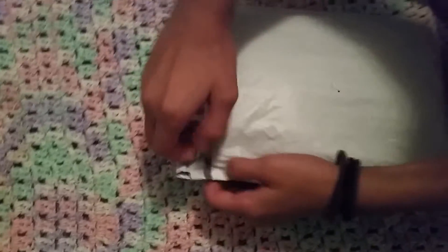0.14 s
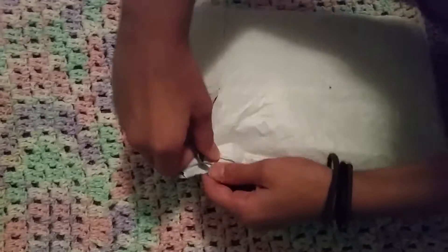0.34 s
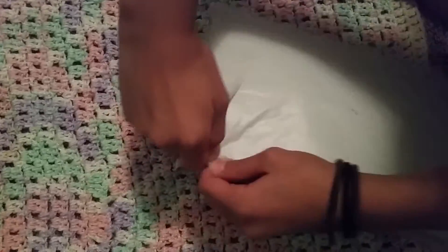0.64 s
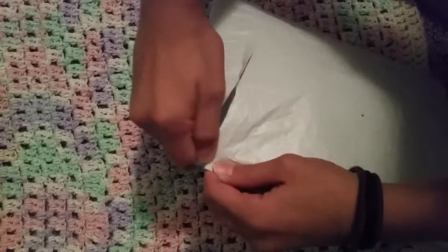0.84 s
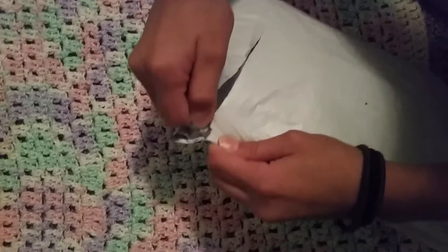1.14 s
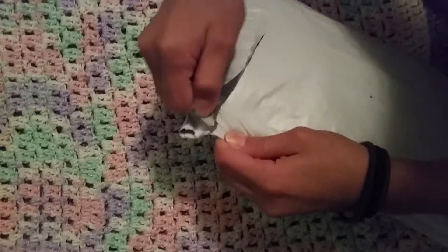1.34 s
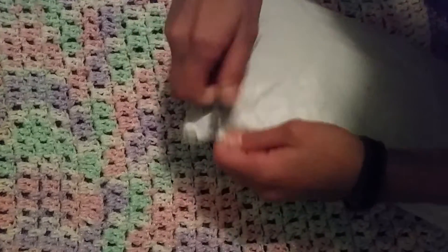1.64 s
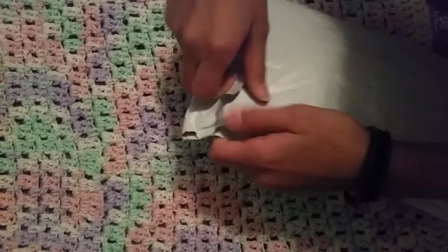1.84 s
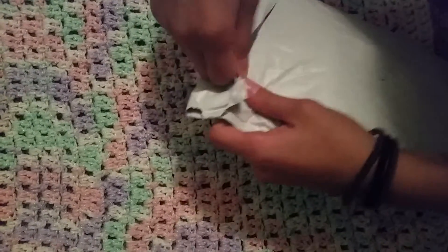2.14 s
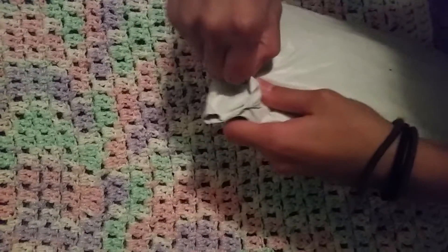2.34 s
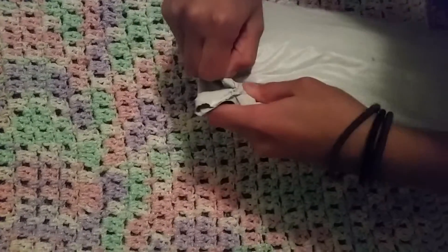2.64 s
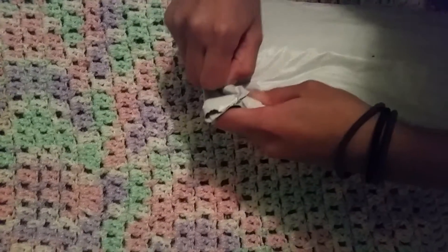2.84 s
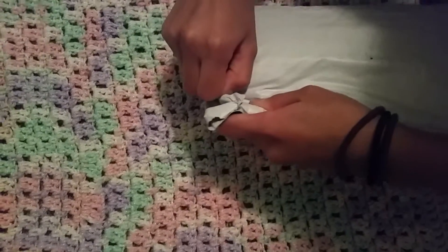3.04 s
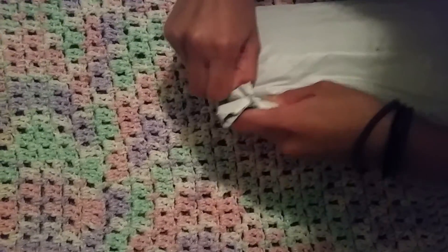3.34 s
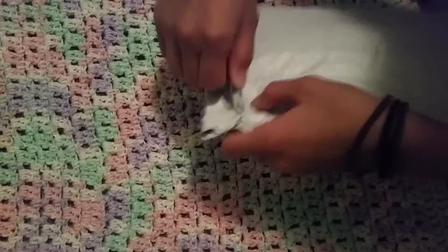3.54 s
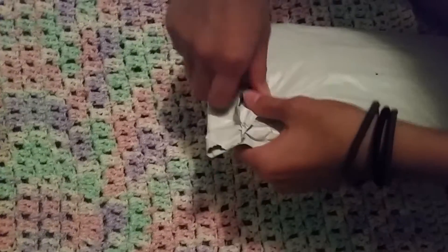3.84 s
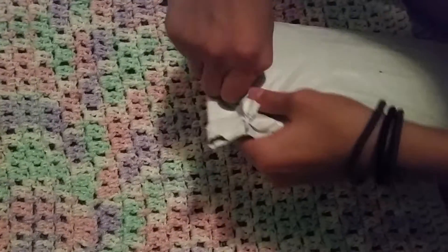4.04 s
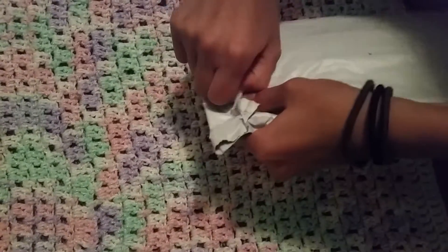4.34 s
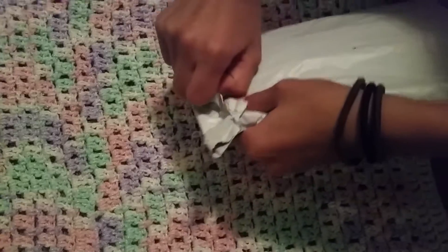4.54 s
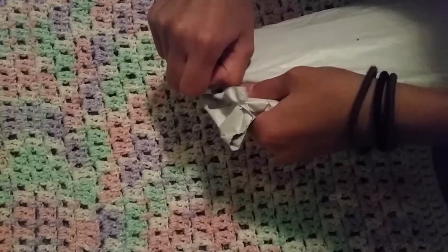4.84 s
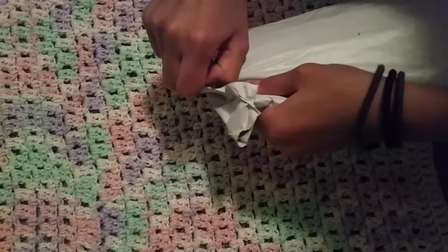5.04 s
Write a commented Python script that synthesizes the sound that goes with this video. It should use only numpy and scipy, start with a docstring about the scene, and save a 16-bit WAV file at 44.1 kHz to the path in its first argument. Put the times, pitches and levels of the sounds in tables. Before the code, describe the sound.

A plastic padded mailer is picked, pulled and crumpled on a soft blanket. Light clicks open, a cluster of sharper crackles follows before one second, then a sparser stretch. Denser crinkling with a tiny stick-slip creak arrives past two seconds, and the loudest clump of snaps and wall pops near four. The sound is close, stereo, leaning left, with thin short echoes and a low, faintly wavering room hum.

```python
"""Crisp snaps and grainy rustle come first: fingers pick and pull at a padded plastic envelope on a blanket,
close to a pair of small microphones. Creases snap over and padded walls buckle: clicks through five bands.
Tugs swell a rustle of random grains over a noise bed; the padded wall creaks in quickening slips.
Thin echoes from nearby surfaces follow, and a low hum of shaped noise fills the room."""
import sys
import numpy as np
from scipy import signal
from scipy.fft import rfft, irfft
from scipy.io import wavfile

SR = 44100
rng = np.random.default_rng(int(sys.argv[2]) if len(sys.argv) > 2 else 0)


def inscribe(sig):
    """Save sig as 16-bit PCM at rate SR to the path in sys.argv[1].

    A 1-D sig is mono; a 2-D sig holds one channel per row.
    Samples are clipped to [-1, 1] before scaling.
    """
    pcm = np.round(np.clip(np.atleast_2d(sig).T, -1, 1) * 32767)
    wavfile.write(sys.argv[1], SR, pcm.astype(np.int16))


def ratio(d):
    """dB to gain"""
    e = np.asarray(d, float) / 20
    return 10 ** e


N = 229577  # length in samples

# Creases of the film snapping over; a negative fall makes a hollow snap:
# start_s, level_db at its own pitch, pitch_octaves above 1 kHz, fall_db_per_octave away from that pitch
CREASE_SNAPS = [(0.0048, -35, 3.6, 14), (0.017, -31, 2.8, 4.5), (0.0279, -42, 4.8, 14),
                (0.1557, -33, 3.0, 4), (0.1722, -28, 2.45, 2), (0.1826, -32, 2.45, 6),
                (0.2328, -27.5, 3.9, 3), (0.2386, -34, 2.45, 0), (0.2518, -38, 4.1, 4),
                (0.4043, -35.5, 2.2, 4), (0.432, -38, 3.75, 8), (0.4748, -47, 2.45, -5),
                (0.5378, -26, 4.2, 16), (0.5576, -27.5, 2.45, 5), (0.634, -28, 4, 2),
                (0.6824, -18, 3.4, 14), (0.6936, -28, 3, -9), (0.7047, -21.5, 4, 1.5), (0.728, 0, 4.05, 33),
                (0.7679, -24, 3.3, 14), (0.8511, -37.5, 3.2, 0), (0.8982, -43, 2.45, 8),
                (0.9155, -34.5, 2.45, 6), (0.96, -32, 4, 1), (0.9907, -26, 4.1, 12), (0.996, -29, 2.2, 8),
                (1.0067, -32, 3.5, 14), (1.022, -36, 3.75, 6), (1.0324, -32, 2.45, 4),
                (1.0424, -28.5, 2.9, 12), (1.0646, -26.5, 3.2, 10), (1.1147, -37.5, 3.75, -3),
                (1.1274, -32, 3.1, 22), (1.185, -35, 3.1, 10), (1.197, -35, 2.8, 2), (1.2375, -27, 2.9, 21),
                (1.2731, -24.5, 3.55, 29), (1.3409, -38, 3.7, 10), (1.369, -54, 2.45, 5),
                (1.5945, -39, 2.45, -4), (1.6457, -37, 4.2, 10), (1.6931, -34, 4, 15),
                (1.7399, -4, 4.29, 23), (1.749, -31, 3.75, 2), (1.7541, -36, 4.2, 6),
                (1.8418, -34.5, 3.7, 3.5), (1.904, -28.5, 3.0, 24), (1.9272, -25, 4.1, 2.5),
                (2.0817, -24, 3.3, 13), (2.1066, -23, 3.65, 19), (2.1157, -30, 3.5, 9),
                (2.1276, -37, 4.6, 7), (2.1646, -23, 2.45, 7), (2.1786, -13, 4.2, 15),
                (2.1835, -25, 4.5, 8), (2.2145, -16, 3.8, 3), (2.2205, -11, 2.45, 21),
                (2.2265, -34, 4.1, 4), (2.2999, -20, 2.5, 19), (2.3533, -37, 2.45, 12), (2.4084, -34, 3, 9),
                (2.4608, -25.5, 3.75, 4.5), (2.4975, -21, 3.1, 11), (2.586, -22, 4.1, 10),
                (2.6983, -33, 4.9, 17), (2.7101, -28, 3.2, 24), (2.8163, -35, 2.45, -1),
                (2.8621, -23, 3.26, 16), (2.8913, -27.5, 3.15, 8), (3.0006, -37, 2.5, 10),
                (3.0211, -23.5, 2.7, 10), (3.069, -33, 3.75, 6), (3.0815, -29, 3.4, 12),
                (3.0939, -29, 3.2, 11), (3.1366, -15.5, 3.64, 17), (3.1536, -21, 2.73, 11),
                (3.158, -36, 3, 6), (3.1799, -26, 3.7, 9), (3.2166, -34, 2.45, 2), (3.2323, -35, 2.45, 6),
                (3.3326, -40, 3.75, 2), (3.3576, -27, 2.55, 27), (3.3738, -26, 2.2, 4),
                (3.5842, -28, 4.5, 6), (3.6004, -21, 4.1, 5), (3.6516, -9.5, 4.1, 19),
                (3.677, -27, 4.9, 17), (3.8774, -29, 2.45, 2), (3.8835, -26.5, 3.1, 14),
                (3.89, -29.5, 2.6, 4), (3.8952, -21, 3.3, 5), (3.9779, -38, 3.5, 14), (4.0261, -16, 2.8, 7),
                (4.036, -13.5, 2.34, 9), (4.0445, -20, 2.5, 12), (4.0503, -25, 3.1, 8),
                (4.0734, -11, 3.56, 15), (4.0799, -21, 2.6, 10), (4.0866, -18, 3.75, 8),
                (4.1064, -26, 2.45, 1), (4.1515, -28, 4.2, 9), (4.1926, -30, 4.1, 5), (4.2319, -34, 4.4, 8),
                (4.3223, -37, 3.75, 0), (4.3471, -25, 4.1, 14), (4.399, -26.5, 3.75, 0),
                (4.5748, -33, 3.1, 4), (4.5854, -37, 2.45, 12), (4.606, -16, 2.74, 12.5),
                (4.6511, -32, 3.6, 2), (4.672, -32, 2.45, 13), (4.6926, -26.5, 4.1, 6),
                (4.7351, -32, 3.45, 11), (4.7547, -30, 2.45, 10), (4.854, -31.5, 2.45, 22),
                (4.9372, -30.5, 2.8, 4), (4.9429, -36, 3.2, 10), (4.9635, -16, 2.7, 7),
                (5.013, -23, 3.06, 11), (5.0288, -43, 2.45, 8), (5.0662, -39, 2.45, 10),
                (5.1268, -21, 3.2, 16), (5.1444, -35, 3.1, 2), (5.1532, -27, 3.0, 11),
                (5.1725, -33, 3.9, 14)]
# Padded walls buckling: start_s, level_db at its own pitch, pitch_octaves above 1 kHz
WALL_POPS = [(0.0562, -27.0, -0.15), (0.0735, -25, 0.32), (0.1021, -28.0, 0.27), (0.1738, -32, 0.45),
             (0.1829, -17.5, 0.26), (0.2242, -33, -0.65), (0.2324, -21, -0.28), (0.2425, -28, -0.49),
             (0.2995, -31, 0.12), (0.3364, -39, 0.037), (0.3559, -32.0, 0.29), (0.403, -36, 0.68),
             (0.4317, -27, 0.1), (0.4398, -27.5, -0.3), (0.6318, -25, 0.09), (0.6477, -31, 0.64),
             (0.6838, -31.0, 0.37), (0.6935, -22, 0.36), (0.7038, -21, 0.39), (0.751, -30, 0.016),
             (0.7703, -33.0, -0.11), (0.785, -33.5, -0.21), (0.8982, -23, 0.34), (0.9167, -29.5, 0.45),
             (0.9758, -33.5, 0.93), (0.996, -25, 0.82), (1.0219, -22, 0.1), (1.0645, -30, 0.21),
             (1.0917, -43, -0.15), (1.106, -37.0, 0.48), (1.1476, -33, -0.11), (1.1972, -24, 0.27),
             (1.3699, -37.0, 0.51), (1.4428, -32, -0.11), (1.4557, -44, 0.76), (1.5004, -42, 0.62),
             (1.553, -46, 0.53), (1.5946, -36, 0.53), (1.636, -29, 0.29), (1.7013, -28, 0.32),
             (1.7378, -21, 0.24), (1.7531, -29, -0.61), (1.768, -30, 0.03), (1.8198, -32.5, -0.12),
             (1.8286, -35, -0.27), (1.9006, -27, -0.047), (1.9189, -28.5, -0.3), (1.9242, -26, 0.15),
             (1.9717, -26.5, 0.2), (2.0368, -33.5, -0.22), (2.044, -42, 0.72), (2.0684, -39, 0.92),
             (2.0821, -26.5, -0.32), (2.1138, -17, -0.39), (2.2187, -16, 0.18), (2.244, -20, 0.26),
             (2.2765, -27, 0.045), (2.293, -20, 0.19), (2.303, -32, -0.11), (2.3125, -25.0, 0.14),
             (2.3244, -24.5, 0.2), (2.353, -24.5, 0.47), (2.3825, -28, 0.094), (2.4107, -27.5, 0.5),
             (2.4265, -18.5, 0.11), (2.4596, -35, 0.5), (2.4963, -31.5, 0.93), (2.5617, -22.5, 0.34),
             (2.586, -21.5, -0.18), (2.611, -41, -0.3), (2.644, -34, -0.24), (2.6597, -35, 0.26),
             (2.6885, -33, 0.27), (2.7131, -36, -0.48), (2.7842, -29.5, 0.27), (2.8622, -42, 0.92),
             (2.891, -32, 0.36), (2.9523, -21, 0.05), (2.963, -41, 0.56), (3, -25, 0.13),
             (3.0206, -20.5, 0.71), (3.0369, -21.5, 0.22), (3.0595, -21, 0.29), (3.0924, -37, 0.17),
             (3.153, -21.5, 0.24), (3.1664, -37, -0.38), (3.1792, -45, 0.59), (3.22, -31, 0.38),
             (3.231, -28, 0.18), (3.3575, -36, 0.0045), (3.372, -41, 0.93), (3.4813, -23, -0.04),
             (3.4917, -24.5, 0.2), (3.602, -29.5, 0.05), (3.6515, -14, -0.16), (3.6596, -21.0, -0.58),
             (3.7814, -31.5, 0.49), (3.8507, -32, 0.074), (3.877, -32, 0.19), (3.8944, -25, 0.04),
             (3.9152, -27, 0.5), (4.0256, -12.5, -0.25), (4.0359, -10.5, -0.19), (4.0449, -15.5, -0.3),
             (4.0526, -32, -0.37), (4.084, -21.5, -0.03), (4.097, -21, 0.22), (4.1067, -27, 0.14),
             (4.1519, -41, 0.9), (4.1614, -33.5, 0.66), (4.274, -30.5, 0.24), (4.33, -25, 0.19),
             (4.3979, -32.5, 0.48), (4.4209, -29, 0.21), (4.4459, -26.5, 0.19), (4.4696, -39, -0.087),
             (4.5434, -50, -0.3), (4.6062, -40, 0.41), (4.6705, -25, 0.14), (4.6922, -37.0, 0.27),
             (4.7545, -40, 0.44), (4.7794, -46, -0.25), (4.8778, -27, 0.18), (4.9357, -34.5, 0.036),
             (4.9639, -21, 0.27), (4.9958, -33.0, -0.12), (5.0129, -31.0, -0.27), (5.029, -31, 0.36),
             (5.0854, -30, 0.23), (5.1231, -37, 0.55), (5.1443, -32.5, 0.36), (5.152, -34, 0.31),
             (5.187, -28.5, 0.42)]
POP_FALL_DB_PER_OCTAVE = 14.5
# Pitch at which each part of the envelope speaks: pitch_octaves above 1 kHz
PART_PITCHES = np.log2([.5, 1.9, 5.5, 8.7, 13.5])
# Parts of the envelope, padding first: low_hz, high_hz, rustle_db relative to the handling,
# scatter_ms, scatter_db relative to the click envelope, likeness of left and right (0 to 1)
SHEET_PARTS = [(176, 1940, -3.5, 1.2, -4.5, 0.47), (1038, 3280, -0.5, 0.8, 0.5, 0.29),
               (3700, 7210, -3.5, 0.58, -0.5, 0.31), (7540, 10170, -4, 0.78, -8.5, 0.18),
               (11050, 21300, -2.5, 0.51, 1, 0.13)]
# Ringing modes of the padded walls: pitch_hz, level_db relative, t60_s
PADDING_MODES = [(412, -3, 0.02), (532, -0.5, 0.014), (663, -12, 0.017), (820, -4, 0.01),
                 (1264, -5.5, 0.0079)]
# Tugs of the fingers: middle_s, length_s, film_db, padding_db relative to the film
FINGER_TUGS = [(0.0, 0.27, -54, -9), (0.094, 0.18, -51, -1.5), (0.208, 0.21, -44, -3.5),
               (0.298, 0.22, -53.5, -4.5), (0.449, 0.21, -54, 0.5), (0.667, 0.58, -46, -6.5),
               (0.75, 0.14, -48.5, -3.5), (0.917, 0.15, -48.5, -5), (1.036, 0.17, -49.5, -5),
               (1.208, 0.45, -58, -5), (1.43, 0.16, -54.5, -7), (1.56, 0.35, -49, -5.5),
               (1.754, 0.21, -50, -3.5), (1.95, 0.28, -49, -7), (2.172, 0.42, -42.5, -7),
               (2.306, 0.38, -39, -5.5), (2.494, 0.37, -45.5, -6.5), (2.685, 0.33, -40, -8),
               (2.887, 0.37, -53, -6.5), (3.021, 0.29, -43, -7.5), (3.233, 0.23, -55, -2.5),
               (3.382, 0.27, -54, -5.5), (3.522, 0.19, -52, -4), (3.657, 0.23, -42, -4.5),
               (3.74, 0.7, -55.5, -1.5), (3.942, 0.9, -48.5, -11.5), (4.095, .07, -40, -8),
               (4.155, 0.19, -54, -6), (4.373, 0.54, -49, -7), (4.566, 0.23, -55, -5),
               (4.713, 0.28, -49.5, -8), (4.872, 0.21, -55.5, -8), (5.06, 0.38, -51, -9.5),
               (5.196, 0.17, -41, -11)]
# Overall left and right colour of the envelope's sound, with a steep treble cutoff above 14.5 kHz:
# pitch_hz, left_db, right_db
STEREO_COLOUR = [(100, 0.1, 0.1), (400, 1, -2), (750, 1, -6), (1000, -6, -13), (1400, -1, -7),
                 (2100, -1, -12), (2900, -8, -16), (3600, -8, -20), (4000, -12, -19), (4600, -7, -13),
                 (5600, 1, -11), (6500, -1, -11), (7200, -5, -14), (8000, -1, -17), (10000, -5, -12),
                 (12400, -9, -3), (13000, -10, -3), (14300, -8, 4), (14520, -8, 3), (14900, -26, -16),
                 (16000, -46, -40)]
# Loudness curve of the hum: time_s, level_db
HUM_LEVEL = [(0.0, -41), (0.55, -42), (0.9, -46), (1.0, -43.5), (2.1, -46), (3.2, -44), (4.0, -44),
             (4.7, -50.5), (5.21, -45.5)]
# Colour of the hum, relative and without its drone: pitch_hz, level_db per Hz
HUM_COLOUR = [(15, -30), (30, -11.5), (58, 0.5), (72, -6), (100, -0.5), (125, -8), (155, -10), (215, -7),
              (290, -19.5), (450, -20), (1000, -32), (1500, -38.5)]
# Stereo image of the hum: pitch_hz, likeness of left and right (0 to 1)
HUM_LIKENESS = [(25, .65), (60, .8), (130, .6), (500, .55), (1000, .4)]

# rustle: middling grain rate, grain level spread, noise bed relative to the grains
GRAINS_PER_S, GRAIN_SPREAD_DB, BED_DB = 800, 4.3, -8
RESTING_FILM_DB, RESTING_PADDING_DB = -67.5, -71.5
# stereo delay of the left channel (negative: left first), and its random spread
LEFT_LAG_MS, SPREAD_MS = -.05, .07
# scatter after a click: growth of its level with the click (dB per dB), click level that counts as usual
SCATTER_GROWTH, USUAL_SNAP_DB = 0.74, -38.5
# creak: slip timing, then its nearly steady level and quick end
CREAK_S, FIRST_GAP_S, GAP_SHRINK, SLIP_COUNT = 2.1228, .0127, .846, 13
CREAK_DB, CREAK_TOP_S, CREAK_RISE_DB_PER_S, CREAK_FALL_DB_PER_S, SLIP_SPREAD_DB = -22, 2.188, 10, 900, 2.5
SLIP_CUT_HZ, SLIP_PANEL_DB = 580, -14  # low cut of the slips; share of a slip that reaches the panel
ECHO_DB, ECHO_T60_S = -13, .15
DRONE_HZ, DRONE_WIDTH_HZ, DRONE_DB = 103.3, 18.3, 11  # the boost above the hum colour


def envelope(colour):
    """Snaps, slips and grains excite each part of the sheet; a swelling, dying scatter follows every click."""
    slips = creak()
    lag_ms = LEFT_LAG_MS + SPREAD_MS * rng.standard_normal(N)
    padding_db, film_db = handling()
    born, grain_sizes, grain_draws = grains()
    grain_lag_ms = LEFT_LAG_MS + SPREAD_MS * grain_draws[:, 5]
    out = 0
    for k, (low_hz, high_hz, rustle_db, scatter_ms, scatter_db, alike) in enumerate(SHEET_PARTS):
        band = signal.butter(3, [low_hz, high_hz], "band", fs=SR, output="sos")
        part = signal.sosfilt(band, colour)
        at, sizes = snaps(k)
        hits = clicks(at, sizes, lag_ms[at])
        if k == 0:  # the lowest part is the padding: it rings
            part = through(part, [padding()])
        if k < 2:  # the slips push padding and panel
            hits += slip_push(slips, k * SLIP_PANEL_DB)
        part = part / np.abs(part).max(axis=1).mean()

        grain_clicks = clicks(born, grain_sizes * ratio(2.7 * grain_draws[:, k]), grain_lag_ms)
        mid, side = rng.standard_normal((2, N))
        noise = np.sqrt((1 + alike) / 2) * mid + np.sqrt((1 - alike) / 2) * side * [[1], [-1]]
        ragged_grains = scattered(grain_clicks, noise, scatter_ms, scatter_db)
        ragged_hits = scattered(hits, noise, scatter_ms, scatter_db, usual=ratio(USUAL_SNAP_DB))
        # reversed in time, the noise serves as a separate bed
        bed = rms_one(through(noise[:, ::-1], part))
        rustle = rms_one(through(ragged_grains, part)) + ratio(BED_DB) * bed
        handling_db = film_db if k > 1 else padding_db
        out = out + through(ragged_hits, part) + ratio(handling_db + rustle_db) * rustle
    return out


def snaps(part):
    """Folds click into one part of the sheet: the nearer its pitch to that of the fold, the louder."""
    rows = np.array(WALL_POPS if part < 2 else CREASE_SNAPS)
    start_s, level_db, pitch_octaves = rows[:, :3].T
    fall_db = POP_FALL_DB_PER_OCTAVE if part < 2 else rows[:, 3]
    level_db = level_db - fall_db * np.abs(pitch_octaves - PART_PITCHES[part])
    return np.round(start_s * SR).astype(int), ratio(level_db)


def clicks(at, sizes, lag_ms):
    """One click per event; its place on the sheet, given as a lag, sets the delay between left and right."""
    out = np.zeros((2, N + 64))
    left_at = np.clip(at + np.round(lag_ms * SR / 1000).astype(int), 0, N)
    np.add.at(out[0], left_at, sizes)
    np.add.at(out[1], at, sizes)
    return out[:, :N]


def scattered(x, noise, scatter_ms, scatter_db, usual=1):
    """Noise swells and dies after each click, growing less than the click: big snaps clean, small ragged."""
    r = np.exp(-1000 / (scatter_ms * SR))
    drive = np.abs(x / usual) ** (2 * SCATTER_GROWTH) + 1e-18
    power = signal.lfilter([(1 - r) ** 2], [1, -2 * r, r * r], drive)
    return x + ratio(scatter_db) * noise * usual * np.sqrt(power)


def padding():
    """The padded walls ring in decaying modes after a push; so small a body radiates little bass."""
    t = np.arange(2048) / SR
    ring = sum(ratio(db - 60 * t / t60) * np.sin(2 * np.pi * hz * t) for hz, db, t60 in PADDING_MODES)
    return signal.lfilter(*signal.butter(1, 300, "high", fs=SR), ring)


def creak():
    """Stick-slip of the stretched padding: slips quicken at a nearly steady level, then die quickly."""
    gaps = FIRST_GAP_S * GAP_SHRINK ** np.arange(SLIP_COUNT)
    start_s = CREAK_S + np.cumsum(gaps) - gaps
    rise_db = CREAK_RISE_DB_PER_S * (CREAK_TOP_S - start_s)
    fall_db = CREAK_FALL_DB_PER_S * (start_s - CREAK_TOP_S)
    level_db = CREAK_DB - np.maximum(rise_db, fall_db)
    return np.transpose([start_s, level_db + SLIP_SPREAD_DB * rng.standard_normal(SLIP_COUNT)])


def slip_push(slips, share_db):
    """Each slip pushes the wall as a click with its lows reduced: the taut wall favours its upper modes."""
    start_s, level_db = slips.T
    at = np.round(start_s * SR).astype(int)
    push = clicks(at, ratio(level_db + share_db), np.full(len(slips), LEFT_LAG_MS))
    return signal.lfilter(*signal.butter(1, SLIP_CUT_HZ, "high", fs=SR), push)


def grains():
    """The envelope rustles in clumps of tiny clicks: a wandering rate gives their times, chance their sizes."""
    rate = GRAINS_PER_S * ratio(5.0 * drift(25))
    born = np.flatnonzero(rng.random(N) < rate / SR)
    draws = rng.standard_normal((N, 7))[born]  # per grain: level in each of five parts, lag, sign
    size_db = GRAIN_SPREAD_DB * np.minimum(rng.exponential(1, N), 4)
    return born, ratio(size_db)[born] * np.sign(draws[:, 6]), draws


def drift(rate_hz):
    """Noise smoothed by two equal low-pass poles wanders with spread 1."""
    r = np.exp(-2 * np.pi * rate_hz / SR)
    return rms_one(signal.lfilter([1], [1, -2 * r, r * r], rng.standard_normal(N + SR))[SR:])


def handling():
    """Rustle level_db of padding and film: each tug swells and fades smoothly over the resting level."""
    padding_power, film_power = ratio(2 * RESTING_PADDING_DB), ratio(2 * RESTING_FILM_DB)
    t = np.arange(N) / SR
    for middle_s, length_s, db, padding_db in FINGER_TUGS:
        power = ratio(2 * db) * np.cos(np.pi * np.clip((t - middle_s) / length_s, -.5, .5)) ** 4
        film_power = film_power + power
        padding_power = padding_power + ratio(2 * padding_db) * power
    return 10 * np.log10(padding_power), 10 * np.log10(film_power)


def stereo_colour(size=2048):
    """Impulse responses that give the left and right channel their overall colour."""
    hz = np.arange(size // 2 + 1) * SR / size
    points, left, right = np.transpose(STEREO_COLOUR)
    return np.array([causal(at_hz(hz, points, db), size) for db in (left, right)])


def causal(db, size):
    """Minimum-phase impulse response of a level curve, by folding its cepstrum forward."""
    cepstrum = irfft(db * np.log(10) / 20)
    cepstrum[1:size // 2] *= 2
    cepstrum[size // 2 + 1:] = 0
    return irfft(np.exp(rfft(cepstrum)))


def through(x, response):
    """Convolve each channel with its response."""
    return signal.fftconvolve(x, response, axes=1)[:, :N]


def rms_one(x):
    """Scale to rms 1."""
    return x / np.sqrt(np.mean(x ** 2) + 1e-20)


def echoes(x):
    """Nearby surfaces return a short thin wash of decaying noise, another in each channel."""
    t = np.arange(.003, .2, 1 / SR)
    thin_noise = signal.lfilter([1, -.9], [1, -.6], rng.standard_normal((2, len(t))))
    wash = thin_noise * ratio(-60 * t / ECHO_T60_S)
    wash = wash / np.sqrt(np.sum(wash ** 2, axis=1, keepdims=True))
    wash = np.pad(wash, ((0, 0), (round(0.0041 * SR), 0)))  # delay before the first return, 4.1 ms
    return ratio(ECHO_DB) * through(x, wash)


def hum():
    """Low rumble with a wavering drone: noise shaped over frequency, partly shared by left and right."""
    hz = np.arange(N // 2 + 1) * SR / N
    alike = at_hz(hz, *np.transpose(HUM_LIKENESS))
    drone_db = DRONE_DB / (1 + ((hz - DRONE_HZ) / DRONE_WIDTH_HZ) ** 2)
    colour_db = at_hz(hz, *np.transpose(HUM_COLOUR)) + drone_db
    mid, side = rfft(rng.standard_normal((2, N))) * ratio(colour_db)
    both = irfft(np.sqrt(1 + alike) * mid + np.sqrt(1 - alike) * side * [[1], [-1]], N)
    time_s, level_db = np.transpose(HUM_LEVEL)
    return ratio(np.interp(np.arange(N) / SR, time_s, level_db)) * rms_one(both)


def at_hz(hz, points, levels):
    """Read a spectrum on a log frequency axis."""
    return np.interp(np.log(hz + 1), np.log(points), levels)


def scene():
    """The envelope with its echoes over the hum."""
    near = envelope(stereo_colour())
    return near + echoes(near) + hum()


def roll_off(x):
    """The treble ends steeply here."""
    return signal.sosfilt(signal.butter(12, 15970, fs=SR, output="sos"), x)


def record(dry):
    """Deliver the finished mix."""
    return roll_off(dry)


dry = scene()
out = record(dry)
inscribe(out)
```